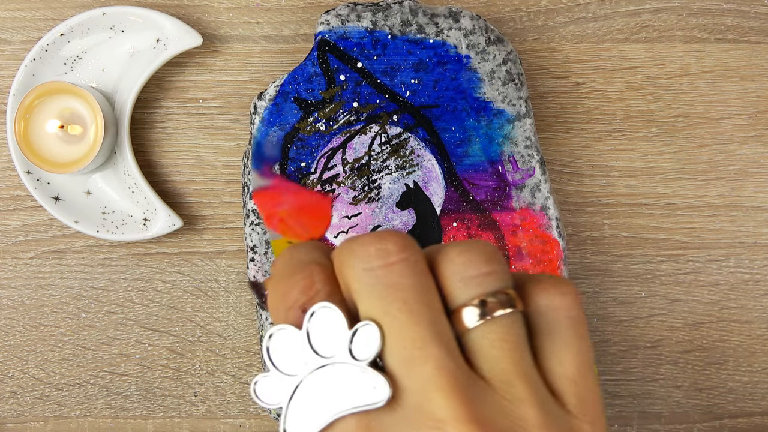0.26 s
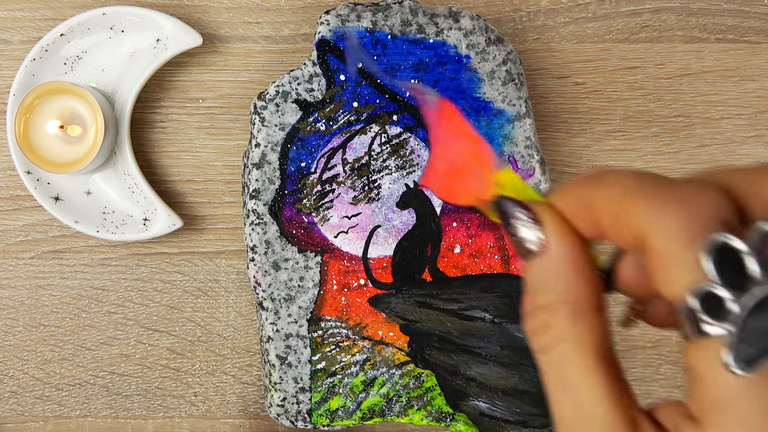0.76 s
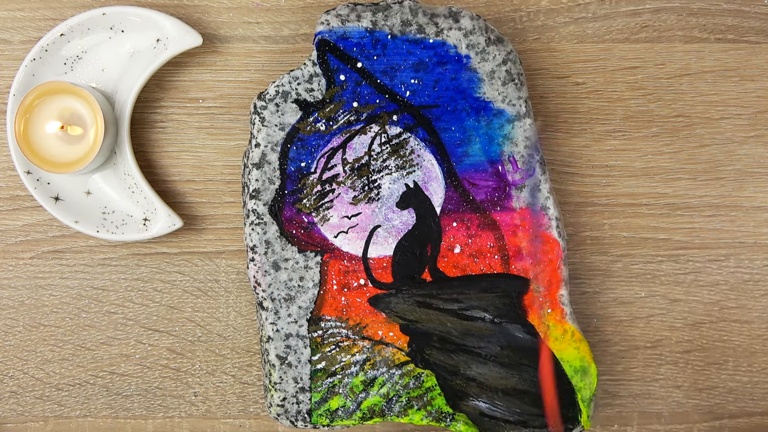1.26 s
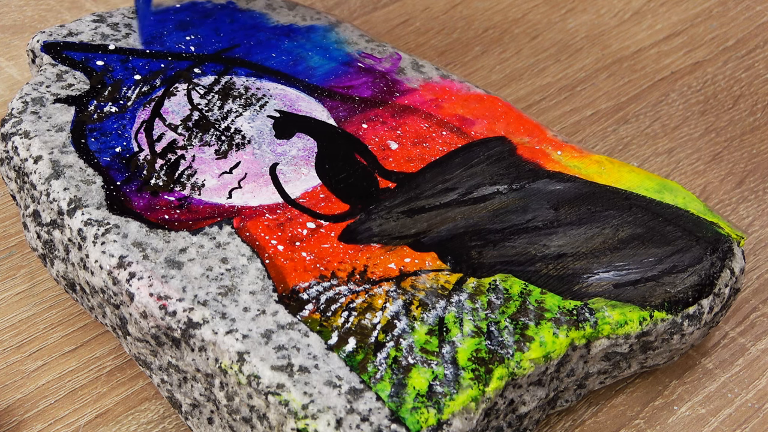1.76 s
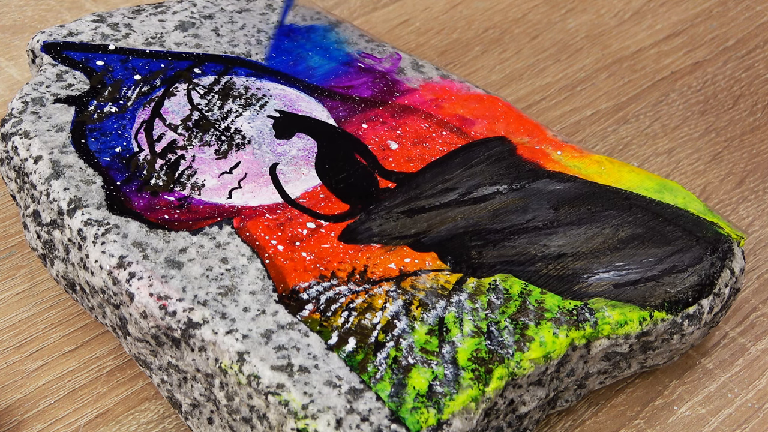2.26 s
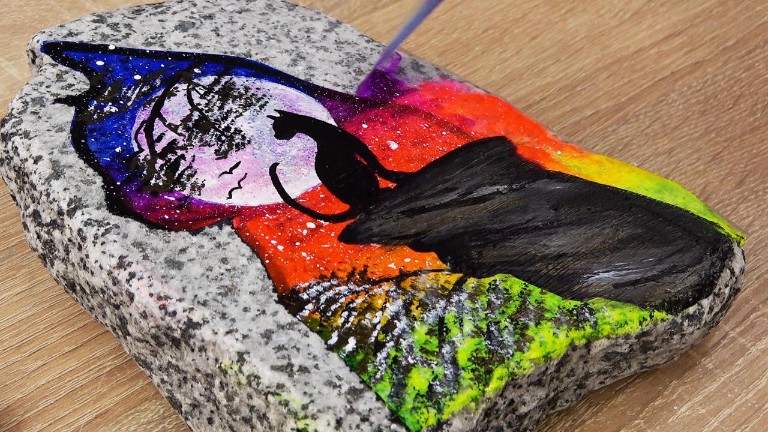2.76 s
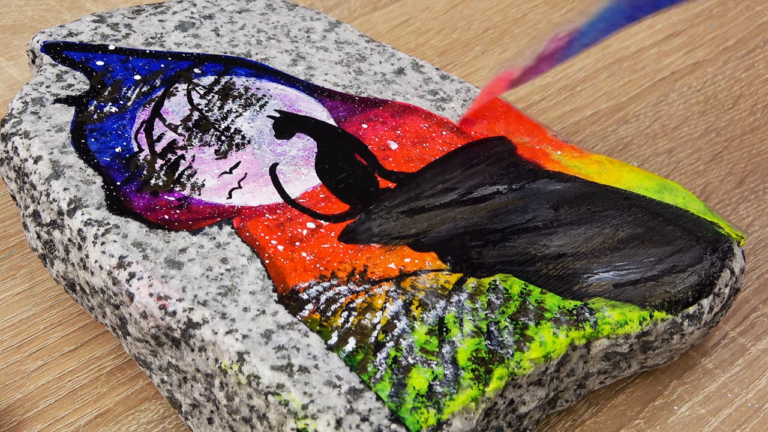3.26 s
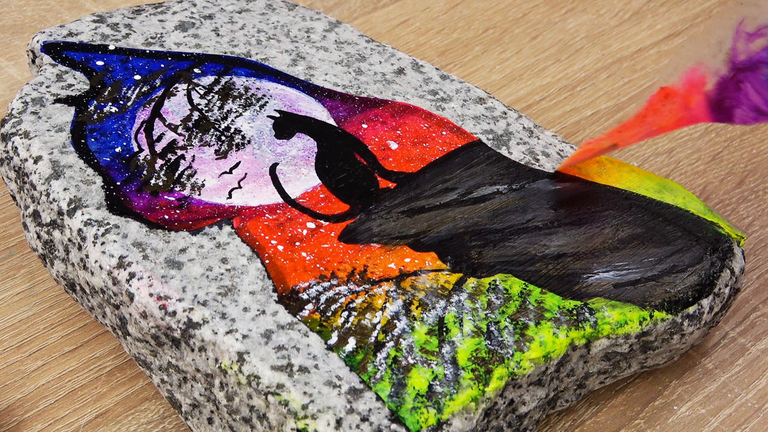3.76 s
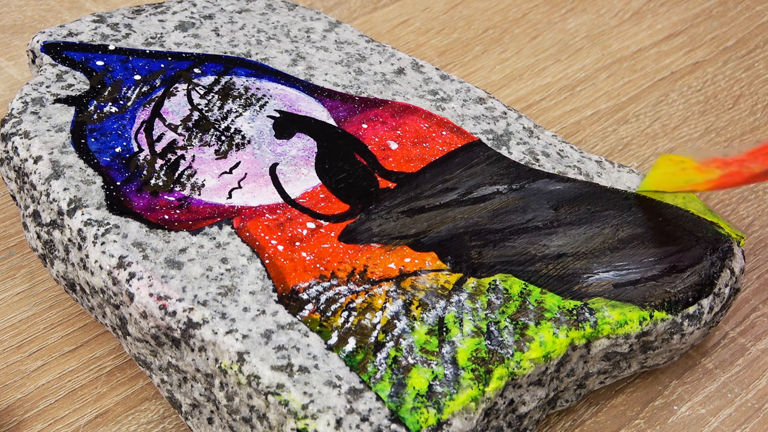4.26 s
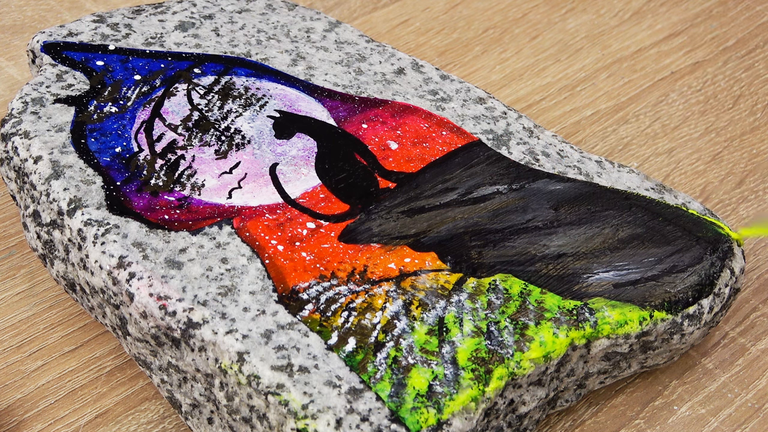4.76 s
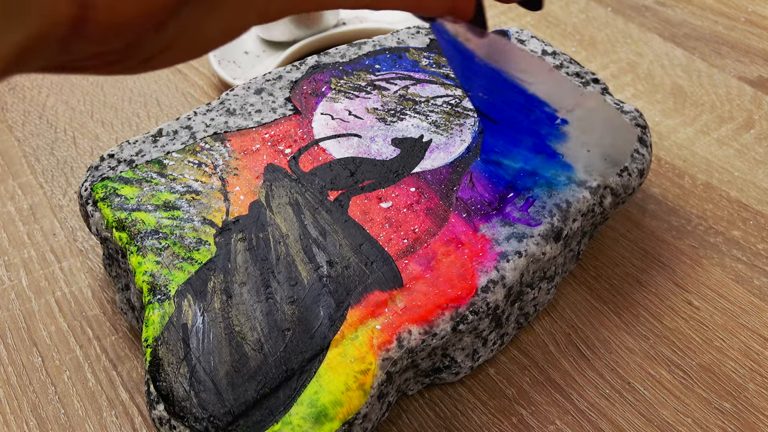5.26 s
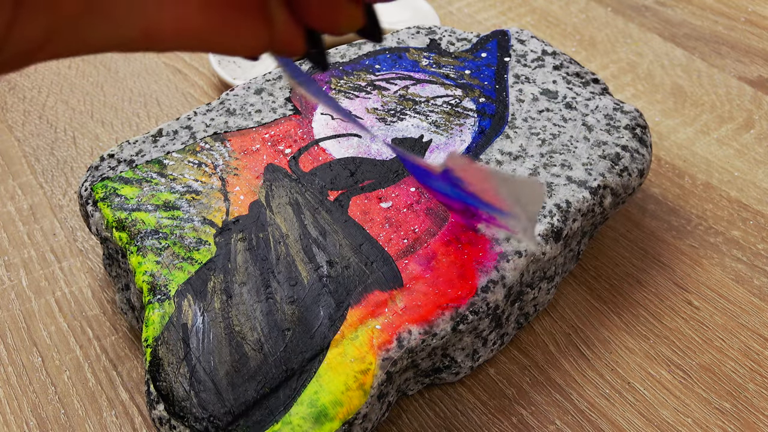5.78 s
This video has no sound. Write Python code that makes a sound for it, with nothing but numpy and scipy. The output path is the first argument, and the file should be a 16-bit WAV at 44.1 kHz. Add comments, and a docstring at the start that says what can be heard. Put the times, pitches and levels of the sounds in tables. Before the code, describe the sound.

Very close to the microphone in a small room, paint-stiffened tape is torn off a stone on a table. Two short, harsh rips come first, the first loud enough to distort. After a near-silent pause, a long uneven peel crackles densely with gritty snaps, dull knocks and low rumble, thins to sparse ticks, then abruptly crackles strongly again to the end.

```python
"""Sharp snaps of glue as paint-stiffened masking strips are peeled off a stone on a table, close to a microphone.
Each snap is a damped swing with a spike of grit and a dull knock of the taut strip; a fine crackle is many small ones.
Shaped noise makes the tearing and the table rumble, with short low thumps under the snaps; noise echoes make the small
room. The loudest snaps clip. The sound dips out briefly at one edit; at a second, an earlier stretch is played again."""
import sys
import numpy as np
from scipy import signal
from scipy.fft import rfft, irfft, next_fast_len
from scipy.io import wavfile
from scipy.ndimage import map_coordinates

SR = 44100
rng = np.random.default_rng(int(sys.argv[2]) if len(sys.argv) > 2 else 0)


def digitize_waveform(pressure):
    """Quantize a signal to 16-bit integers and store it at the path in sys.argv[1].

    Rows of a 2-D input are taken as channels; values are limited to [-1, 1].
    """
    field = np.atleast_2d(pressure).T
    bounded = np.clip(field, -1, 1)
    quanta = np.round(bounded * 32767).astype(np.int16)
    wavfile.write(sys.argv[1], SR, quanta)


N = 265482

# large breaks of glue and paint: t/s, swing level/dB, pitch f/Hz, dull knock level/dB re swing
SNAPS = [(0.1372, -39.5, 6900, -15), (0.196, -8.5, 5100, -18.5), (0.212, 8, 6660, -21.5),
         (0.2199, 2.5, 9300, -12), (0.2217, 2.5, 6780, -22), (0.2253, 5, 8430, -25.5),
         (0.2294, 3.5, 9400, -28), (0.237, -0.5, 10290, -15), (0.2422, -6.5, 9750, -4.5),
         (0.2555, -7.5, 11900, -17), (0.2621, -3.5, 7170, -9), (0.2664, 2.5, 6700, -26.5),
         (0.2708, 2.5, 7430, -19), (0.2775, -3.5, 6880, -9), (0.281, -8, 5900, -20.5),
         (0.284, 6.5, 6350, -22.5), (0.2866, 13, 6270, -26), (0.2929, 5.5, 7180, -8),
         (0.2961, -12.5, 6120, -16), (0.2991, -9.5, 5900, -5.5), (0.3016, -4, 6330, -23),
         (0.306, -3, 7400, -27), (0.3114, -2, 6070, -13), (0.318, 3.5, 8600, -9), (0.3237, -5.5, 7540, -11),
         (0.3305, -9, 7340, 5), (0.332, -3.5, 6880, -38), (0.3377, -11.5, 8770, -19),
         (0.3378, -15, 8800, -3), (0.3504, -14, 8180, -8.5), (0.3547, -15.5, 10200, -24.5),
         (0.5804, -20.5, 9100, -28.5), (0.5919, -14, 8340, -14), (0.601, -16, 8260, -17.5),
         (0.6128, -13.5, 7000, -17), (0.6163, -26.5, 5060, -13), (0.6256, -9.5, 5300, -21),
         (0.6345, -4.5, 7900, -10.5), (0.6385, -5.5, 6230, -9.5), (0.6438, -4, 4750, 1),
         (0.6563, 6, 10060, -14), (0.6607, -5.5, 8640, -17), (0.6652, -10.5, 9600, -27),
         (0.6718, 4, 12260, -39.5), (0.681, -1.5, 8420, -16.5), (0.6933, -3, 8300, -12),
         (0.7046, -2.5, 5700, 0.5), (0.7268, -15.5, 2690, 10.5), (0.7344, -7.5, 7450, -23.5),
         (0.7423, -8, 7330, -24), (0.7774, -8, 2555, 3.5), (0.785, -2.5, 5900, -7),
         (0.7979, -10.5, 7350, -22), (0.811, -7, 5360, -13), (0.8334, -6, 4560, 2), (0.853, -23, 2910, 1),
         (0.882, -2.5, 7880, -9), (0.8927, -17, 4620, 0.5), (0.908, -13.5, 6800, 0),
         (0.9595, -9.5, 6200, 1), (0.9679, -11, 6500, 3), (1.0008, 2.5, 5420, -8),
         (1.0102, -8.5, 3560, 6.5), (1.4205, -21, 7240, 2.5), (1.433, -68.5, 2600, 44),
         (1.4595, -12.5, 6300, -6), (1.484, -17, 6040, 0), (1.5128, -5, 5690, -7), (1.593, -16, 5000, -24),
         (1.5969, -18.5, 6860, -6), (1.617, -13, 8300, -27), (1.625, -5, 7560, -16), (1.6491, -28, 5800, 7),
         (1.663, -10.5, 5060, -1), (1.6822, -9, 5950, -22), (1.69, -20, 4900, 3),
         (1.7036, -8.5, 7400, -19.5), (1.7844, -7.5, 7600, -19), (1.8054, 0, 6670, -30.5),
         (1.8117, -21, 7380, -13), (1.8273, -2.5, 5430, -37.5), (1.851, -7, 8740, -15),
         (1.8833, 0.5, 7000, -10), (1.8943, -10.5, 5600, -12.5), (1.902, -1, 7140, -24),
         (1.9236, -7, 7470, -38), (1.9288, -15.5, 5540, -5), (1.9662, -14, 5100, 0),
         (1.9962, -22.5, 3800, 5), (1.9964, -16, 5500, -22), (2.0193, -2.5, 5800, -7),
         (2.0225, -5.5, 4700, 2), (2.0264, -4.5, 3800, -16.5), (2.084, -5, 7000, -23),
         (2.0995, -14, 5600, -4), (2.1232, 1, 7670, -8.5), (2.1644, -12, 5600, -31),
         (2.1806, -12.5, 5900, -34.5), (2.195, -7, 6300, -51), (2.2054, -15, 7000, -34),
         (2.2174, -9.5, 5500, -41.5), (2.2373, -7, 3800, -28.5), (2.243, -10, 5920, -40),
         (2.253, -14, 8100, -31), (2.2567, -10, 6200, -32), (2.263, -13.5, 5670, -43.5),
         (2.2676, 5, 6280, -31), (2.2783, -4.5, 8530, -31.5), (2.284, -6.5, 6740, -11),
         (2.2964, 2.5, 5950, -50), (2.3076, -0.5, 6300, -17), (2.3246, -10, 7260, -16.5),
         (2.3417, -7, 6530, -15), (2.355, -2.5, 4770, -27), (2.3579, 1, 6130, -35),
         (2.3703, -14, 6000, -25), (2.3758, 2, 6780, -33), (2.3895, -2, 6650, -44), (2.3931, -4, 6830, -40),
         (2.3955, -1.5, 5700, -23), (2.4225, 7.5, 6430, -38), (2.4348, 5.5, 5430, -37),
         (2.4399, -7.5, 5700, -6), (2.4561, -2, 5220, -15), (2.4791, -0.5, 6600, -27),
         (2.5021, 1.5, 6520, -33), (2.5093, -11, 5240, -29), (2.514, -0.5, 6910, -32),
         (2.518, 8.5, 5900, -35), (2.559, 1, 5700, -13), (2.5795, -9, 6900, -25), (2.5964, -3.5, 6040, -30),
         (2.6227, -9, 4710, -16), (2.626, -0.5, 6580, -16), (2.6409, -2.5, 5700, -8.5),
         (2.648, -6, 6230, -21), (2.6642, 2.5, 5970, -39.5), (2.668, -6, 7060, -2),
         (2.6785, 7.5, 5660, -31.5), (2.6827, -1, 5400, -18), (2.688, -2, 6350, -22.5),
         (2.6919, 4, 6330, -36), (2.7018, 0.5, 5110, -20.5), (2.7096, 0, 6940, -4.5),
         (2.7217, -11.5, 3500, -1.5), (2.7274, 7, 5400, -21), (2.7378, 3.5, 6330, -27.5),
         (2.7464, -1, 4300, -8), (2.762, 0.5, 5440, -12), (2.766, 10.5, 6630, -38.5),
         (2.777, -3.5, 6210, -22.5), (2.795, -3, 6600, -29), (2.8065, 2, 5330, -27),
         (2.8235, -1, 4790, -16.5), (2.8315, 2.5, 5200, -31), (2.8345, -3, 4780, -29),
         (2.8632, -5, 4630, -34), (2.8682, -7.5, 7530, -21), (2.871, 5.5, 5030, -35),
         (2.8815, -3.5, 4120, -20.5), (2.8874, -1, 5430, -33), (2.898, 0, 5900, -22.5),
         (2.9136, 2, 7340, -29), (2.92, 4.5, 5200, -66), (2.926, -3, 6150, -5), (2.9355, -2.5, 6700, -18.5),
         (2.9518, 3, 5700, -28), (2.962, 6, 5300, -34), (2.9721, 6, 6320, -28), (2.9964, 5.5, 7430, -19),
         (3.0031, 8, 5100, -24.5), (3.0205, 5.5, 6030, -14), (3.032, 1, 5640, -14.5),
         (3.051, -0.5, 7260, -17.5), (3.0698, -0.5, 5400, -26.5), (3.0753, 2, 6280, -24.5),
         (3.0857, 1, 5370, -8), (3.114, -1, 6760, -7.5), (3.139, -10, 6720, -19), (3.1548, -8.5, 6200, -35),
         (3.166, -3.5, 5600, -25.5), (3.1735, -2, 5600, -6), (3.179, -1, 8070, -29.5),
         (3.2045, -12.5, 8740, -5), (3.2108, -1, 7600, -19), (3.2203, -3, 6100, -15.5),
         (3.2319, 4, 6170, -11), (3.2666, -5, 6140, -24), (3.272, -9, 6630, -20), (3.2802, 2, 6740, -40.5),
         (3.2861, -5.5, 6300, -24), (3.2935, 1.5, 5720, -14.5), (3.317, -5.5, 7730, -28.5),
         (3.34, 3, 6690, -29.5), (3.358, -5, 7120, -9), (3.3683, -9, 6060, -3), (3.3735, 5, 5600, -20.5),
         (3.3903, -10, 5730, -19), (3.4, 2.5, 7200, -25.5), (3.4084, -6, 5330, -5), (3.4305, -4, 6030, -19),
         (3.439, 7.5, 6930, -19), (3.4525, 0.5, 7060, -22.5), (3.4624, 3.5, 7480, -40.5),
         (3.4675, -8, 8930, -32.5), (3.484, -2, 6560, -16), (3.502, 3.5, 6360, -15),
         (3.5063, -1, 6860, -24), (3.532, -2.5, 6860, -11), (3.5364, -3, 7700, -33),
         (3.5457, -4.5, 6180, -5.5), (3.561, -2, 5670, -29.5), (3.5769, 6.5, 6230, -23),
         (3.59, 2.5, 6400, -15), (3.5977, -4.5, 8100, -21), (3.622, -8, 8400, -6), (3.63, 2, 7100, -34.5),
         (3.6583, 3, 7600, -17), (3.6779, -8, 7170, -32), (3.684, 3.5, 6740, -17), (3.7077, -3, 5140, -16),
         (3.796, -18, 4400, -18), (3.8396, 2.5, 7340, -25), (3.9537, -19, 6200, -34),
         (3.9713, -17, 7000, -19), (3.9757, -15.5, 4400, -14), (4.0045, -15, 7040, -30),
         (4.016, -13, 7600, -30), (4.0343, -22.5, 4900, -2), (4.053, -8.5, 6160, -10),
         (4.0741, -23.5, 4200, -3), (4.0873, -14.5, 6500, -13), (4.236, -31.5, 8850, -15),
         (4.257, -21, 3100, -20), (4.264, -15, 3700, -8), (4.3153, -23, 6960, 5), (4.328, -8, 10870, -35),
         (4.3507, -15, 4400, -17), (4.3947, -13.5, 3920, -27), (4.4023, -10.5, 7500, -30),
         (4.416, -32, 3100, 2), (4.419, -23, 3100, -7), (4.4516, -17, 3750, -11), (4.468, -19.5, 3280, -16),
         (4.55, -25, 3400, -20), (4.5832, -23.5, 3530, -3.5), (4.8156, -30.5, 4000, -8),
         (4.827, -23, 3320, -15), (4.8325, -14, 5600, -22), (4.876, -21.5, 3970, -35),
         (4.886, -24.5, 4230, -30)]
# modes of the taut strip: f/Hz at tension 1, middle level/dB, t60/s
STRIP_MODES = [(1226, 1, 0.0075), (1804, -2.5, 0.0073), (2320, -10.5, 0.0027), (770, -8, 0.0089)]
# the strip in hand: t/s, middle crackle pitch f/Hz, crackle knock level/dB, tension (factor on the modes), grit level/dB
STRIP_IN_HAND = [(.3, 8030, -2, 0.81, -3), (.66, 7800, -8, 1.05, -2.5), (1.0, 5043, -14.5, 1.047, 4.5),
                 (1.45, 4970, 3.5, 0.98, 7), (1.7, 5120, 3.5, 1.05, 1), (1.85, 5380, -7.5, 0.93, 1),
                 (3.0, 5770, -16.5, 0.975, -7.5), (3.7, 6430, -36, 0.832, -3.5),
                 (4.2, 4040, -7, 0.99, -6.5)]
# tugs of the hand: start t/s, length t/s, fine crackle base level/dB, rumble level/dB, flap start pitch f/Hz
TUGS = [(.1, 0.2, -49, -60, 200), (0.209, 0.054, -24, -36.5, 249.9), (.26, 0.084, -17.5, -38, 189.2),
        (0.491, 0.27, -53.5, -62.5, 200.6), (0.589, 0.11, -23, -38.5, 199.7),
        (.72, 0.065, -40.5, -35, 229.6), (.79, .1, -32.5, -46.5, 95), (0.915, 0.033, -64.5, -43.5, 100),
        (0.987, 0.014, -34, -39, 90), (1.425, 0.16, -46.5, -51.5, 149.8), (1.607, 0.095, -33, -49, 201.1),
        (1.739, 0.049, -48.5, -50, 250.8), (1.788, 0.17, -23.5, -44, 270),
        (1.975, 0.078, -30.5, -43, 270.7), (2.079, 0.18, -37, -40.5, 330), (2.237, 0.14, -26.5, -40, 248.7),
        (2.4, 0.045, -37, -37.5, 250), (2.493, .05, -29.5, -44.5, 150.3), (2.556, 0.11, -45, -49.5, 130),
        (2.663, .115, -25.5, -38.5, 179.5), (2.808, 0.19, -32, -45, 139.4),
        (2.97, 0.096, -27.5, -46, 170.3), (3.104, 0.086, -46, -46.5, 100.4),
        (3.187, 0.12, -33, -43.5, 152.6), (3.344, .11, -47.5, -44, 253.7), (3.503, .1, -39, -43.5, 222),
        (3.639, 0.12, -44, -51, 200), (3.794, 0.39, -51, -74, 151.4), (4.254, 0.22, -50, -67, 178),
        (4.495, 0.07, -60, -76, 176.6), (4.788, 0.055, -52.5, -64, 169.4)]
# dull body of the tearing, relative spectrum: f/Hz, level/dB per Hz
TEAR_SPECTRUM = [(150, -120), (300, -20.5), (390, 2.5), (700, 1), (910, -24), (1540, -120)]
# stone shaking the table, relative spectrum: f/Hz, level/dB per Hz
RUMBLE_SPECTRUM = [(15, -45), (25, -5.5), (48, -12.5), (90, -3), (243, -1.5), (330, -4), (420, -21.5),
                   (600, -120)]
# a rip just before the start, dying in the room, relative spectrum: f/Hz, level/dB per Hz
EARLIER_SPECTRUM = [(180, -17.5), (300, -7), (486, -19.5), (1080, -15.5), (1720, -27), (9240, -27.5),
                    (16000, -33)]
# still room, relative spectrum: f/Hz, level/dB per Hz
HUSH_SPECTRUM = [(15, -23.5), (30, -13), (60, -20), (250, -19.5), (700, -29), (2000, -35), (8000, -41),
                 (16000, -41.5)]
# decay of the room: f/Hz, t60/s
ROOM_DECAY = [(300, 0.99), (1500, 0.39), (5000, 0.38), (10000, 0.3), (15000, 0.24)]
# decay of the nearby surfaces: f/Hz, t60/s
TABLE_DECAY = [(500, 0.077), (3000, 0.038), (12000, 0.017)]
# microphone colour: f/Hz, level/dB
MIC_COLOUR = [(60, -1), (1000, -7), (3000, 0), (6000, -1.5), (9000, 2), (12000, -0.5), (15000, -3.5),
              (16000, -23.5)]

# a tug takes hold, holds, and dies away
TUG_ATTACK_S, CRACKLE_T60_S = 0.0083, 0.13
RUMBLE_ATTACK_S, RUMBLE_T60_S = 0.032, 0.28
JERK_DB = 6.5  # the pull is never even
SAG_OCTAVES_PER_S, SLACK_HZ = 2.4, 100  # the flap sinks as more strip comes free, down to its slack pitch
TEAR_RE_TUG_DB = -17.5  # below the base level of the crackle
THUMP_DB, THUMP_HZ, THUMP_DB_PER_SNAP_DB = -26.5, 610, 1.4  # middle level and pitch of the low thump under a 0 dB snap
HUSH_DB = -62
DIP_S, CUT_S, REPLAY_S, FADE_S = 1.414, 4.914, 2.094, 0.0051  # from CUT_S on, REPLAY_S onward is heard again
TOP_HZ = 16430


def amp(db):
    """Decibels to a gain."""
    return 10 ** (np.asarray(db) / 20)


def unit(x):
    """Scale to rms 1."""
    return x / np.sqrt(np.mean(x ** 2) + 1e-20)


def along(points, hz):
    """Read (Hz, value) points on a log frequency axis."""
    f, v = np.transpose(points)
    return np.interp(np.log(hz + 1), np.log(f + 1), v)


def curve(rows, column, s):
    """One column of a table at the times s."""
    rows = np.vstack(rows)
    return np.interp(s, rows[:, 0], rows[:, column])


def filtered(x, response):
    """Shape the spectrum of x with a response of frequency."""
    m = next_fast_len(N + SR // 2)
    spectrum = rfft(x, m) * response(np.fft.rfftfreq(m, 1 / SR))
    return irfft(spectrum, m)[..., :N]


def noise(spectrum):
    """Noise of rms 1 with a given spectrum."""
    return unit(filtered(rng.standard_normal(N), lambda hz: amp(along(spectrum, hz))))


def wobble(rate):
    """A smooth random curve with rate knots a second."""
    knots = rng.standard_normal(int(N * rate / SR) + 4)
    return map_coordinates(knots, [np.arange(N) * rate / SR])


def place(s, rows):
    """Sum short sounds, one a row, at their times."""
    at = np.round(s * SR).astype(int)[:, None] + np.arange(rows.shape[1])
    return np.bincount(np.clip(at, 0, N).ravel(), rows.ravel(), N + 1)[:N]


def tugging(column, attack, t60, s):
    """Level in dB at the times s: every tug rises, holds and dies away."""
    start, length, db = np.transpose(TUGS)[[0, 1, column], :, None]
    rise = np.clip((s - start) / attack, 0, 1)
    since_release = np.clip(s - start - length, 0, None)
    shape = rise * amp(db - 60 * since_release / t60)
    return 20 * np.log10(shape.sum(axis=0) + 1e-6)


def hush():
    """The still room is a bed of steady, mostly low noise."""
    return amp(HUSH_DB) * noise(HUSH_SPECTRUM)


def earlier_rip():
    """Of a rip before the start only the echo is left, noise that fades exponentially."""
    t = np.arange(N) / SR
    return amp(-39.5 - 60 * t / 0.39) * noise(EARLIER_SPECTRUM)


def echoes(x, decay, seconds, parts):
    """Decaying noise answers; the source moves, so each stretch of time has a new answer."""
    out = np.zeros(N + 2 * SR)
    step = N // parts + 1
    for at in range(0, N, step):
        hz, t, z = signal.stft(rng.standard_normal(int(seconds * SR)), SR, nperseg=128)
        fading = z * amp(-60 * t / along(decay, hz)[:, None])  # each band at its own rate
        tail = signal.istft(fading, SR, nperseg=128)[1]
        answer = signal.fftconvolve(x[at:at + step], tail / np.linalg.norm(tail))
        out[at + 20:at + 20 + len(answer)] += answer  # the echo path is 20 samples longer
    return out[:N]


def band_around(k, turn, rate):
    """Noise around k times a gliding pitch: two wobbling carriers a quarter turn apart."""
    return unit(wobble(rate) * np.cos(k * turn) + wobble(rate) * np.sin(k * turn))


def flap():
    """The loose strip flaps in two modes at a pitch that sinks through each tug."""
    t = np.arange(N) / SR
    start, *_, start_hz = np.transpose(TUGS)
    tug = np.clip(np.searchsorted(start, t) - 1, 0, None)
    sagging = start_hz[tug] * 2 ** (-SAG_OCTAVES_PER_S * np.abs(t - start[tug]))
    turn = 2 * np.pi * np.cumsum(np.maximum(sagging, SLACK_HZ)) / SR
    return band_around(0.97, turn, 45) + amp(-6) * band_around(1.5, turn, 90)


def rumble():
    """The tugged stone shakes the table in lumps of low noise, with the flap of the loose strip on top."""
    t = np.arange(N) / SR
    shake = unit(amp(1.4 * wobble(30)) * noise(RUMBLE_SPECTRUM))
    level = amp(tugging(3, RUMBLE_ATTACK_S, RUMBLE_T60_S, t))
    return level * (shake + amp(-3.5) * flap())


def tear():
    """A dull, lumpy rush of noise under the crackle that swells with each tug and dies away more slowly."""
    tug_db = tugging(2, TUG_ATTACK_S, RUMBLE_T60_S, np.arange(N) / SR)
    rush = unit(amp(2.5 * wobble(40)) * noise(TEAR_SPECTRUM))
    return amp(TEAR_RE_TUG_DB + tug_db) * rush


def thumps():
    """Each large break carries one short low thump, a heavily damped swing, stronger under loud snaps, as from overload."""
    s, snap_db = np.transpose(SNAPS)[:2]
    luck = rng.standard_normal((len(s), 3))
    turn = THUMP_HZ * np.exp(.15 * luck[:, :1]) * np.arange(400) / SR
    thump = np.cos(2 * np.pi * turn) * np.exp(-turn / 0.59)
    thump *= (1 - np.exp(-turn / .08)) * np.sign(luck[:, 2:])  # soft onset, either polarity
    thump_db = THUMP_DB + THUMP_DB_PER_SNAP_DB * snap_db[:, None] + 2.2 * luck[:, 1:2]
    return place(s, amp(thump_db) * thump)


def clicks(db, hz, cycles, s, size):
    """Each break is a damped swing at its pitch that starts with a spike of grit."""
    t = np.arange(size) / SR
    luck = rng.standard_normal((len(db), size + 1))
    turn = np.clip(hz, 800, 15000)[:, None] * t
    swing = np.sin(2 * np.pi * turn) * np.exp(-turn / cycles)
    swing *= np.sign(luck[:, :1]) * np.exp(1 / (4 * cycles))  # either polarity, first crest at 1
    spike = amp(curve(STRIP_IN_HAND, 4, s))[:, None] * luck[:, 1:] * amp(-60 * t / 0.0012)
    return amp(db)[:, None] * (swing + spike)


def knocks(s, db, size):
    """A break also rings the strip, each mode at a new strength and a little off pitch as the tension shifts."""
    t = np.arange(size) / SR
    luck = rng.standard_normal((len(db), 2, len(STRIP_MODES), 1))
    hz, level, t60 = np.transpose(STRIP_MODES)[:, :, None]
    hz = hz * curve(STRIP_IN_HAND, 3, s)[:, None, None] * np.exp(0.092 * luck[:, 1])
    modes = amp(level + 3.8 * luck[:, 0] - 60 * t / t60) * np.sin(2 * np.pi * hz * t)
    rings = modes.sum(axis=1) * (1 - np.exp(-t / 0.00038))  # soft onset
    return amp(db)[:, None] * rings / np.abs(rings).max(axis=1, keepdims=True)


def crackle(count=4400):
    """Many small threads of glue break at random; a few are much larger than the rest."""
    s = rng.uniform(0, N / SR, count)
    jerk_db = JERK_DB * wobble(16)[(s * SR).astype(int)]
    size_db = 5.43 * np.minimum(rng.exponential(size=count), 3.2)
    db = tugging(2, TUG_ATTACK_S, CRACKLE_T60_S, s) + jerk_db + size_db
    hz = curve(STRIP_IN_HAND, 1, s) * np.exp(0.49 * rng.standard_normal(count))
    bright = place(s, clicks(db, hz, cycles=0.79, s=s, size=64))
    knock_s = s[::4]  # every fourth thread also knocks
    knock_db = db[::4] + curve(STRIP_IN_HAND, 2, knock_s)
    return bright + place(knock_s, knocks(knock_s, knock_db, size=700))


def snaps():
    """The large breaks, each with its own pitch and knock; the crack runs on in two weaker breaks close by."""
    s, db, hz, knock_db = np.transpose(SNAPS)
    luck = rng.uniform(size=(len(s), 2, 3))
    out = place(s, clicks(db, hz, cycles=1.0, s=s, size=96))
    out += place(s, knocks(s, db + knock_db, size=700))
    for late, weaker, detune in luck.transpose(1, 2, 0):
        near_hz = hz * (0.76 + 0.83 * detune)
        near = clicks(db - 5.5 - 12 * weaker, near_hz, cycles=1.18, s=s, size=64)
        out += place(s - .0007 + .0024 * late, near)  # 0.7 ms early to 1.7 ms late
    return out


def scene():
    """Peeling near the table top, in the room, with the replayed stretch at the end."""
    # a small source sends out no bass
    peel = filtered(snaps() + crackle(), lambda hz: (1j * hz / (600 + 1j * hz)) ** 3)
    near = amp(-10.5) * echoes(peel, TABLE_DECAY, seconds=0.05, parts=120)
    far = amp(-13.5) * echoes(peel, ROOM_DECAY, seconds=0.5, parts=20)
    heard = peel + near + far + earlier_rip() + rumble() + tear() + thumps() + hush()
    cut, replay = round(CUT_S * SR), round(REPLAY_S * SR)
    joined = np.concatenate([heard[:cut], heard[replay:replay + N - cut]])
    gap = np.abs(np.arange(N) / SR - np.array([[DIP_S], [CUT_S]])).min(axis=0)
    fade = np.clip(gap / FADE_S, 0, 1)  # out and in again at each edit
    return (fade * joined)[None]


def record(dry):
    """Microphone colour, rounded clipping at full scale and the band limit."""
    x = filtered(dry, lambda hz: amp(along(MIC_COLOUR, hz)))
    x = x / (1 + np.abs(x) ** 8) ** (1 / 8)
    return np.clip(filtered(x, lambda hz: hz < TOP_HZ), -1, 1)


dry = scene()
out = record(dry)
digitize_waveform(out)
```